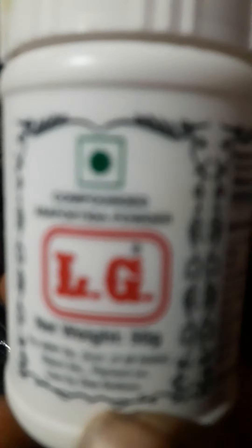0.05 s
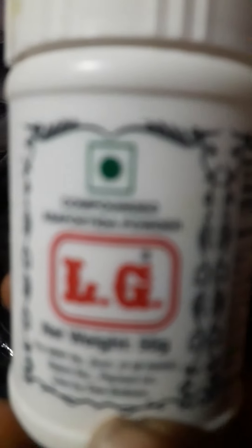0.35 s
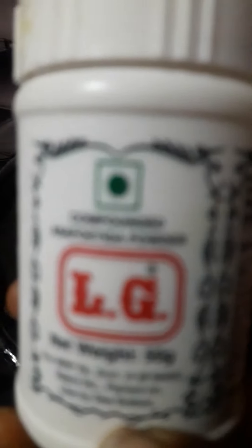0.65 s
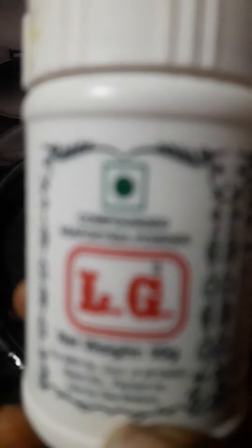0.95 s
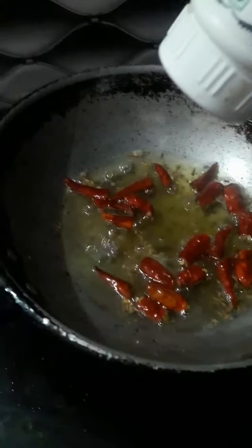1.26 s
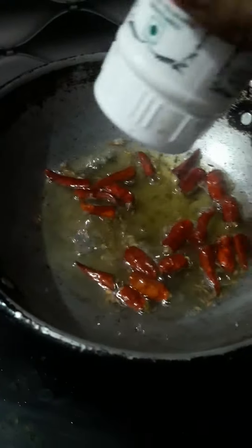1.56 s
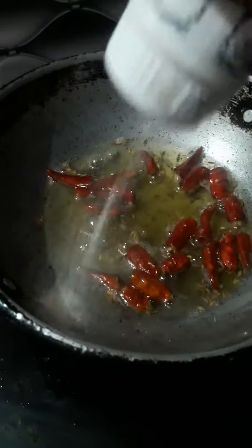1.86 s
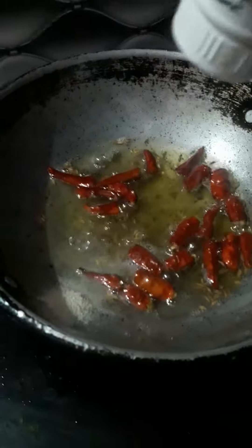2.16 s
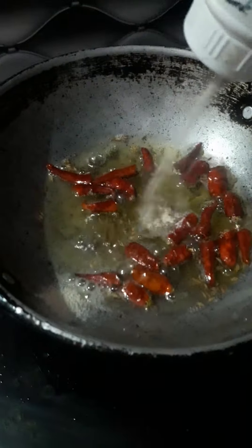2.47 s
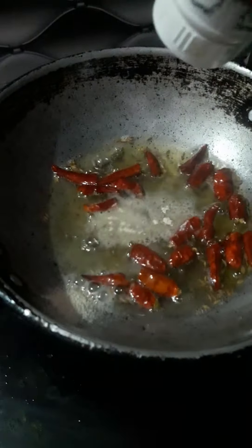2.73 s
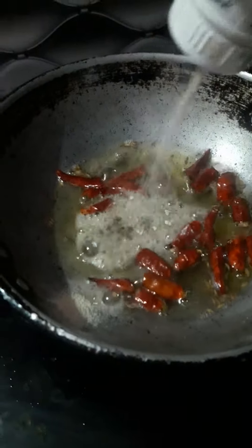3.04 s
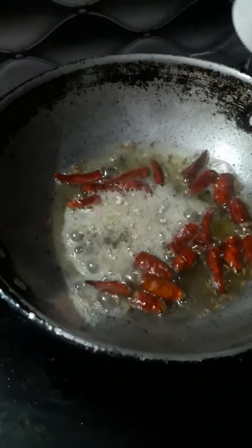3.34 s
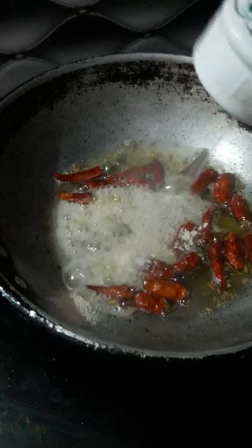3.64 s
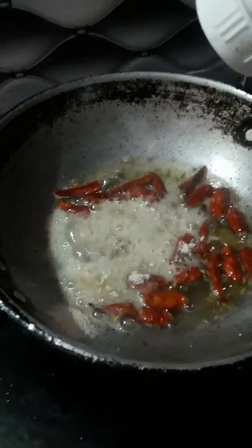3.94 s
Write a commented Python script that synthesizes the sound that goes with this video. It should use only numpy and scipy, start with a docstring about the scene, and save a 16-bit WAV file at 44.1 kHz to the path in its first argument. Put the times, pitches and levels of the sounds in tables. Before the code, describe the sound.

Oil sizzles softly in a metal pan, close up in a small kitchen, over a brief low drone. Halfway through, added powder foams and the sizzle swells with crackling bubbles, one popping loudly near the end.

```python
"""A small kitchen, close to a metal pan where chillies fry in a little hot oil.
Countless tiny bubbles burst into a sizzle. Powder shaken in foams from about 2 s: the sizzle thickens,
larger bubbles pop, and one bursts loudly near the end. Fingers rustle and tap on the plastic powder
bottle. A low motor-like drone fills the first second, then sinks into house rumble and room tone."""
import sys
import numpy as np
from scipy import signal
from scipy.fft import rfft, irfft
from scipy.io import wavfile
from scipy.ndimage import uniform_filter1d

SR = 44100
rng = np.random.default_rng(int(sys.argv[2]) if len(sys.argv) > 2 else 0)


def wav_out(sig):
    """Save sig, one row per channel (or a flat mono array), as 16-bit PCM at SR to the path in sys.argv[1]."""
    wavfile.write(sys.argv[1], SR, np.round(np.clip(np.atleast_2d(sig).T, -1, 1) * 32767).astype(np.int16))


N = 176400
T, HZ = np.arange(N) / SR, np.fft.rfftfreq(N, 1 / SR)
CLICK_HZ = np.fft.rfftfreq(2048, 1 / SR)

# sizzle layers, oil, foaming powder and finest fizz: (frequency [Hz], level [dB])
OIL_EQ = [(500, -30), (1500, -20), (3000, -12.5), (4400, -12.5), (5700, -6.5), (6400, -3.5), (6900, 0),
          (7400, -7.5), (8100, -18.5), (9500, -15), (11500, -21.5), (16000, -20.5)]
FOAM_EQ = [(300, -18.5), (380, -7.5), (480, -14), (1000, -19), (2500, -13.5), (4000, -8.5), (5200, -2.5),
           (6700, 3.5), (8200, -8), (10000, -8.5), (12000, -15.5), (16000, -15.5)]
FIZZ_EQ = [(3000, -42), (7500, -1), (10000, -16), (13000, -3), (16000, -6.5)]
# their fader rides: (time [s], level [dB])
OIL_FADER = [(0, -52), (.6, -52.5), (1.1, -52.5), (1.8, -54), (2.3, -54), (2.8, -48.5), (3.3, -51.5),
             (3.7, -48.5), (4, -46)]
FOAM_FADER = [(0, -75), (1.8, -85), (2.1, -58), (2.5, -53.5), (2.75, -48.5), (3.1, -44.5), (3.5, -44),
              (3.65, -42.5), (4, -48.5)]
FIZZ_FADER = [(0, -88), (1.85, -64), (1.95, -55.5), (2.15, -57.5), (2.45, -57), (2.8, -51), (3.3, -52.5),
              (3.7, -57), (4, -52)]
# popping bubbles, before trims: (time [s], level [dB], ring [Hz], body [dB], treble [dB])
POPS = [(1.7823, -33.5, 6970, -30, -24), (1.8967, -38.5, 6860, -18.5, -9), (2.0242, -34, 7000, -27, -11),
        (2.1031, -33, 6200, -31, -17), (2.2017, -42, 7000, -27, -6), (2.323, -34, 6600, -28, -9),
        (2.36, -33, 6040, -19, -11), (2.52, -30.5, 8900, -29, -18), (2.6526, -22.5, 5950, -16.5, -10.5),
        (2.7887, -23.5, 6600, -24, -14), (2.8474, -22, 6300, -21, -29), (2.9774, -41, 7160, -28, -10),
        (3.057, -24.5, 6960, -27, -24), (3.0845, -25, 6500, -20, -21), (3.1361, -26, 6800, -32, -22),
        (3.153, -30, 6800, -31, -8), (3.2388, -18.5, 7160, -30, -45), (3.3209, -16, 6450, -22, -16),
        (3.3556, -24, 6340, -12, -33), (3.4688, -16, 6870, -44, -16), (3.6742, -19, 6570, -24, -43),
        (3.7078, -20.5, 6570, -39, -35), (3.7483, -24, 6760, -25, -9.5), (3.7812, -22, 6700, -23, -16)]
# ticks on the oil's surface, before trim: (time [s], level [dB], centre [Hz])
TICKS = [(0.4928, -51, 9080), (0.9602, -48, 13100), (1.9471, -42, 13300), (1.9979, -45, 12600),
         (2.043, -39, 9210), (2.2015, -40, 12400), (2.2659, -38, 14600), (2.3221, -37, 12300),
         (2.3421, -39, 11700), (2.423, -39.5, 12300), (2.4594, -40, 11900), (2.5617, -39, 15100),
         (2.7049, -38, 8650), (2.7716, -33, 8330), (2.9844, -30.5, 8070), (3.31, -32, 8240),
         (3.3669, -37, 12200), (3.4078, -38, 14900), (3.4271, -39, 9910), (3.6436, -41, 8420)]
# the loud burst's snap and spray: (frequency [Hz], level [dB])
SNAP_EQ = [(1500, -33), (3000, -12), (4200, -1), (6800, 7), (8000, -5), (10500, -4.5), (12500, -31),
           (16000, -13)]
SPRAY_EQ = [(400, -26.5), (850, -9.5), (1150, -18), (1500, -6), (2700, -11.5), (3500, -3), (5000, 0),
            (6800, -2), (8000, -9), (10300, -8.5), (12500, -23.5), (16000, -19)]
# hisses from pan and bottle: (time [s], length [s], centre [Hz], width [Hz], level [dB])
SPURTS = [(0.222, .025, 13500, 3000, -55.5), (0.259, 0.052, 2410, 400, -52.5),
          (.315, 0.027, 3200, 1800, -52.5), (0.438, 0.024, 6660, 700, -49), (0.511, 0.099, 2340, 800, -57),
          (.91, 0.03, 5500, 1380, -53), (1.073, .08, 10400, 1400, -65), (1.15, 0.066, 2160, 600, -59),
          (1.402, 0.047, 7000, 895, -55), (1.409, .06, 2200, 600, -59.5), (1.702, .06, 3140, 800, -58),
          (1.942, 0.032, 13000, 5000, -52), (2.959, .04, 7400, 1400, -44.5), (3.472, .03, 7000, 1300, -40)]
# finger tap on the bottle: (frequency [Hz], level [dB])
TAP_EQ = [(300, -32), (1050, -18), (1400, 1), (2300, 1), (3300, -5), (4100, -6), (4900, -4), (6700, 0),
          (8500, -8.5), (15500, -6.5)]
# plastic squeaks: (centre [Hz], width [Hz], level [dB])
SQUEAK_BANDS = [(1563, 240, -0.5), (1780, 150, -3), (2044, 240, -3), (2330, 320, -0.5), (2670, 460, -7.5)]
# hum tones: (frequency [Hz], level [dB])
HUM_TONES = [(84, -54), (140, -60.5), (167, -67)]
# drone resonances: (centre [Hz], width [Hz], level [dB])
DRONE_BANDS = [(207, 33, -66), (249.4, 37, -58.5), (321.6, 26, -59), (407.3, 45, -64.5), (1227, 210, -69),
               (1495, 160, -69.5)]
# fader rides on squeaks, hum and drone: (time [s], level [dB])
SQUEAK_FADER = [(0, -74), (.3, -68), (.6, -67), (.8, -68.5), (1.1, -70.5), (1.19, -67), (1.55, -68),
                (1.85, -69), (2.12, -66), (2.4, -69), (4, -66.5)]
HUM_FADER = [(0, -6), (.3, 0.5), (.45, -3.5), (.63, 6.5), (.8, -6), (1.05, -1), (1.2, -17), (2.4, -21),
             (4, -12.5)]
DRONE_FADER = [(0, -7), (.3, 0), (.47, 0.5), (.8, 1.5), (.96, -0.5), (1.05, 4), (1.14, 0.5), (1.18, -17),
               (3.3, -18.5), (4, -14)]
# house rumble, room tone, its stereo side and the kitchen's reverb: (frequency [Hz], level [dB])
RUMBLE_EQ = [(20, -21), (40, -36), (53, -9.5), (68, -11.5), (86, 3.5), (100, -1), (125, -8.5), (160, -21),
             (300, -33.5)]
ROOM_TONE_EQ = [(110, -2), (170, 1), (250, -0.5), (370, 3.5), (470, -3.5), (640, -3), (800, -1.5),
                (950, -5.5), (1300, -6.5), (2000, -11), (3000, -12.5), (5500, -43)]
SIDE_EQ = [(60, -9), (550, 4), (1500, -12.5), (4000, -34)]
REVERB_EQ = [(200, -8), (1500, -4.5), (3000, -0.5), (4500, 2.5), (6800, 0.5), (8500, -7), (12000, -8.5),
             (16000, -9)]
# fader rides on rumble and room tone: (time [s], level [dB])
RUMBLE_FADER = [(0, -56.5), (1.2, -60.5), (1.5, -63), (2.3, -60.5), (2.75, -54.5), (3.2, -63.5),
                (3.55, -53.5), (4, -58)]
ROOM_TONE_FADER = [(0, 2), (1.1, 2.5), (1.4, 0.5), (2.2, 0), (2.8, 2), (3.4, 3), (4, -0.5)]
# early reflections off the pan wall and nearby surfaces: (delay [s], gain [linear])
ECHOES = [(.0009, .35), (.0031, .25), (.0041, 0.28), (.0052, .25), (0.019, .1)]


def frying():
    """The oil's steady sizzle, joined by foam and fizz as the powder wets."""
    oil = sizzle(OIL_EQ, per_s=5000, spread_db=2.5, cap_db=11, tint_db=2, wet_db=3)
    foam = sizzle(FOAM_EQ, per_s=3500, spread_db=3.5, cap_db=23.5, tint_db=4.5, wet_db=3)
    fizz = sizzle(FIZZ_EQ, per_s=1500, spread_db=4, cap_db=20.5, tint_db=3, wet_db=-1.5)
    return oil * fader(OIL_FADER) + foam * fader(FOAM_FADER) + fizz * fader(FIZZ_FADER)


def sizzle(colour, per_s, spread_db, cap_db, tint_db, wet_db, spots=10):
    """Tiny bubbles of uneven size burst, each spot in the pan with its own tint."""
    out = np.zeros(N)
    for _ in range(spots):
        bursts = crackle(per_s / spots, spread_db, cap_db)
        tint = amp(tint_db * ripple(CLICK_HZ))
        grain = unit(click(eq(colour, CLICK_HZ) * tint))
        grains = signal.oaconvolve(bursts, grain)[:N]
        out += space(grains, ring_db=3 + wet_db, room_db=-7.5 + wet_db)
    return unit(out)


def pops(trim_db=-2, body_trim_db=15, treble_trim_db=5.5, delay_s=.0006):
    """Larger bubbles snap open: a brief ring, a lower body and a bright edge."""
    out = np.zeros(N)
    body = click(band(CLICK_HZ, centre=4060, width=3400))
    treble = click(band(CLICK_HZ, centre=10160, width=4800))
    for s, db, ring_hz, body_db, treble_db in POPS:
        ring = click(band(CLICK_HZ, ring_hz, width=2500) ** 2)
        pop = ring + amp(body_db + body_trim_db) * body + amp(treble_db + treble_trim_db) * treble
        wet = space(np.pad(pop, (0, SR // 3)), ring_db=-1, room_db=-5)
        place(out, s + delay_s, amp(db + trim_db) * wet)
    return out


def ticks(trim_db=4):
    """The smallest bubbles give only a bright tick."""
    out = np.zeros(N)
    for s, db, hz in TICKS:
        tick = np.pad(click(band(CLICK_HZ, hz, width=3300)), (0, SR // 3))
        place(out, s, amp(db + trim_db) * space(tick, ring_db=-2, room_db=-3))
    return out


def oil_burst(s=3.5655):
    """One bubble bursts loudly: a tight snap with a longer wash of spray."""
    snap = space(crack(s, SNAP_EQ, db=-6.5), ring_db=-1.5, room_db=-8, ring_t60=.021)
    spray = space(crack(s, SPRAY_EQ, db=-18.5), ring_db=13, room_db=8, ring_t60=.06)
    return snap + spray


def spurts():
    """Short scratchy hisses: runs of tiny clicks through one resonance, faded in and out."""
    out = np.zeros(N)
    for s, length, hz, width, db in SPURTS:
        arch = np.sin(np.pi * np.arange(0, 1, 1 / (length * SR)))
        clicks = crackle(per_s=900, spread_db=3, cap_db=9)
        scratch = irfft(rfft(clicks) * band(HZ, hz, width), N)
        place(out, s, amp(db) * arch * unit(scratch[:len(arch)]))
    return out


def bottle_tap(s=1.5565):
    """A finger taps the powder bottle and the plastic chatters briefly."""
    return space(crack(s, TAP_EQ, db=-24), ring_db=7, room_db=.5, ring_t60=.021)


def bottle_rustle(flicker_db=5, flicker_hz=22):
    """Fingers slide on the bottle: narrow squeaks, each coming and going on its own."""
    slow = 1 / (1 + (HZ / flicker_hz) ** 4)
    out = np.zeros(N)
    for hz, width, db in SQUEAK_BANDS:
        squeak = noise(band(HZ, hz, width))
        flicker = amp(flicker_db * np.clip(noise(slow), -2, 1))
        out += amp(db) * unit(squeak * flicker)
    return out * fader(SQUEAK_FADER)


def motor_drone(waver_hz=1):
    """A motor-like bed: low tones waver together under rough bands of noise."""
    waver = waver_hz * noise(1 / (1 + (HZ / 4) ** 4) * (HZ > 1))
    drift = np.cumsum(waver) / SR
    hum = sum(amp(db) * unit(np.sin(2 * np.pi * (hz * T + drift + rng.random())))
              for hz, db in HUM_TONES)
    drone = sum(amp(db) * noise(band(HZ, hz, width)) for hz, width, db in DRONE_BANDS)
    return hum * fader(HUM_FADER) + drone * fader(DRONE_FADER)


def house_rumble():
    """The low end of the house, slowly swelling and sinking."""
    return noise(eq(RUMBLE_EQ, HZ)) * fader(RUMBLE_FADER)


def room_tone(ripple_db=2.5, mid_db=-61.5, side_db=-83):
    """Kitchen air, rippled by the room's many resonances, with a touch of stereo width."""
    resonances = amp(ripple_db * ripple(HZ) * np.minimum(HZ / 500, 1))
    mid = amp(mid_db) * noise(eq(ROOM_TONE_EQ, HZ) * resonances) * fader(ROOM_TONE_FADER)
    side = amp(side_db) * noise(eq(SIDE_EQ, HZ))
    return mid + np.outer([1, -1], side)


def space(x, ring_db, room_db, ring_t60=.054, room_t60=.28):
    """Dry sound plus early echoes, a quick ring in pan or bottle and the kitchen's tail."""
    t, hz = T[:SR // 2], np.fft.rfftfreq(SR // 2, 1 / SR)
    ring, tail = rng.choice([-1., 1.], (2, len(t)))
    ring = ring * amp(-60 * t / ring_t60)
    tail = irfft(rfft(tail) * eq(REVERB_EQ, hz), len(t)) * amp(-60 * t / room_t60)
    response = amp(ring_db) * ring / np.linalg.norm(ring) + amp(room_db) * tail / np.linalg.norm(tail)
    response[0] = 1
    for delay, gain in ECHOES:
        response[round(delay * SR)] += gain
    return signal.oaconvolve(x, response)[:len(x)]


def crackle(per_s, spread_db, cap_db):
    """Randomly timed impulses, mostly small, a few hot."""
    sizes = amp(np.minimum(spread_db * rng.exponential(1, N), cap_db))
    return sizes * rng.choice([-1, 1], N) * (rng.random(N) < per_s / SR)


def crack(s, colour, db):
    """One dry, sharp hit on an empty track."""
    out = np.zeros(N)
    place(out, s, amp(db) * click(eq(colour, CLICK_HZ)))
    return out


def click(spectrum):
    """A minimum-phase click of height 1."""
    log_gain = np.log(np.maximum(np.r_[spectrum, spectrum[-2:0:-1]], 1e-5))
    wave = np.fft.ifft(np.exp(np.conj(signal.hilbert(log_gain)))).real
    return wave / abs(wave).max()


def noise(spectrum):
    """Coloured noise at rms 1."""
    return unit(irfft(rfft(rng.standard_normal(N)) * spectrum, N))


def ripple(hz):
    """Random bumps and dips across the spectrum, at rms 1."""
    return unit(uniform_filter1d(rng.standard_normal(len(hz)), size=70))


def band(hz, centre, width):
    """Gain of a steep-sided resonance."""
    return 1 / (1 + ((hz ** 2 - centre ** 2) / ((hz + 1) * width)) ** 2)


def eq(points, hz):
    """Gain over frequency, rolling off below the first point."""
    knots, db = np.transpose(points)
    low_cut = np.minimum(hz / knots[0], 1) ** 2
    return amp(np.interp(np.log(hz + 1), np.log(knots), db)) * low_cut


def fader(points):
    """Gain over time."""
    return amp(np.interp(T, *np.transpose(points)))


def amp(db):
    """Decibels to gain."""
    return 10 ** (np.asarray(db) / 20)


def unit(x):
    """Scales to rms 1."""
    return x / np.sqrt(np.mean(x ** 2) + 1e-20)


def place(mix, s, sound):
    """Mixes a sound in at s seconds."""
    part = mix[round(s * SR):][:len(sound)]
    part += sound[:len(part)]


def scene():
    """Pan and bottle in the centre, the kitchen around them."""
    hits = oil_burst() + bottle_tap()
    rumble = house_rumble()
    pan = frying() + pops() + ticks()
    return pan + hits + bottle_rustle() + spurts() + motor_drone() + rumble + room_tone()


def record(dry, cutoff_hz=16000):
    """A steep high cut on the master."""
    high_cut = signal.firwin(511, cutoff_hz, window=("kaiser", 9), fs=SR)
    return signal.oaconvolve(dry, high_cut[None], "same")


dry = scene()
out = record(dry)
wav_out(out)
```